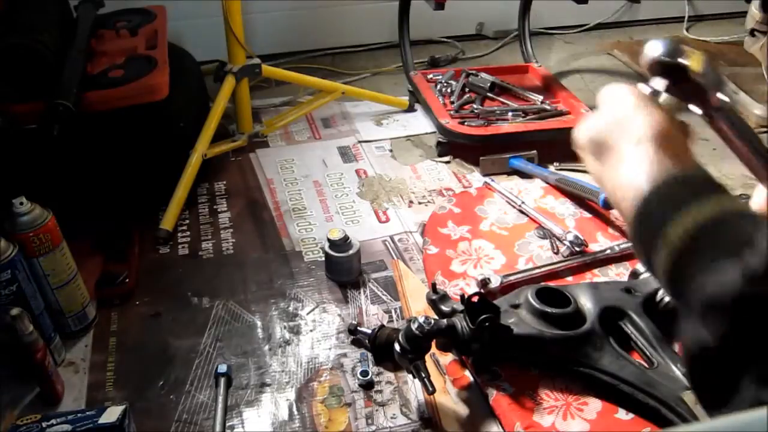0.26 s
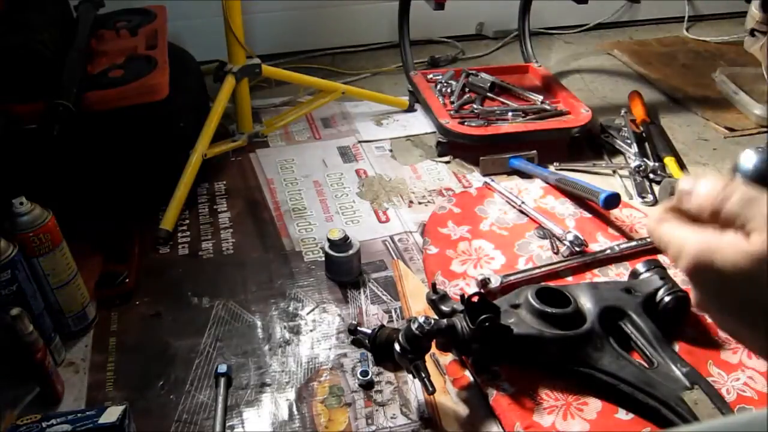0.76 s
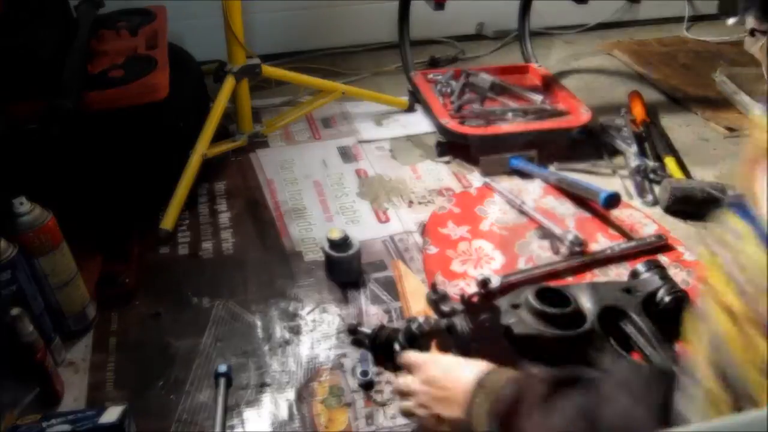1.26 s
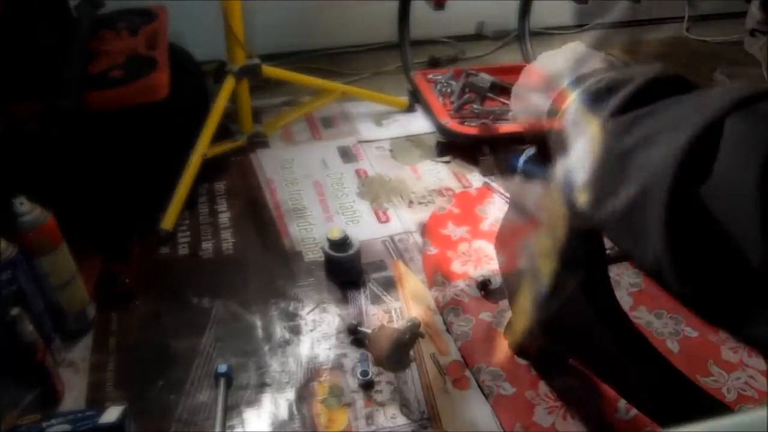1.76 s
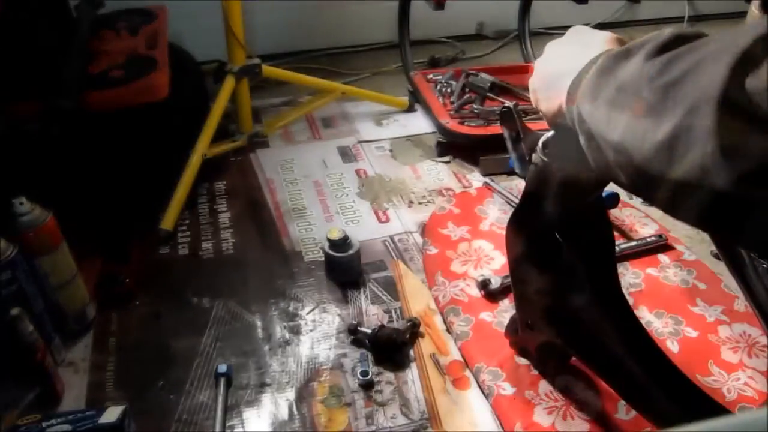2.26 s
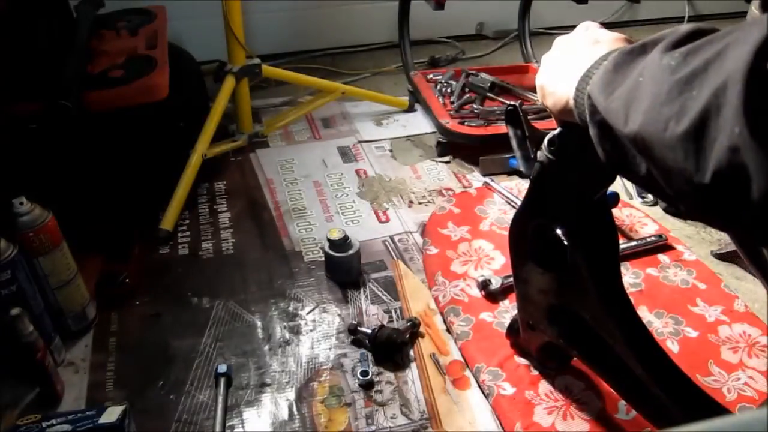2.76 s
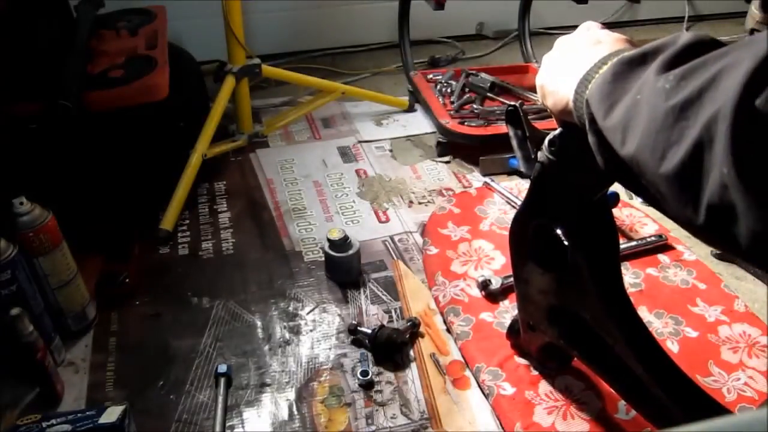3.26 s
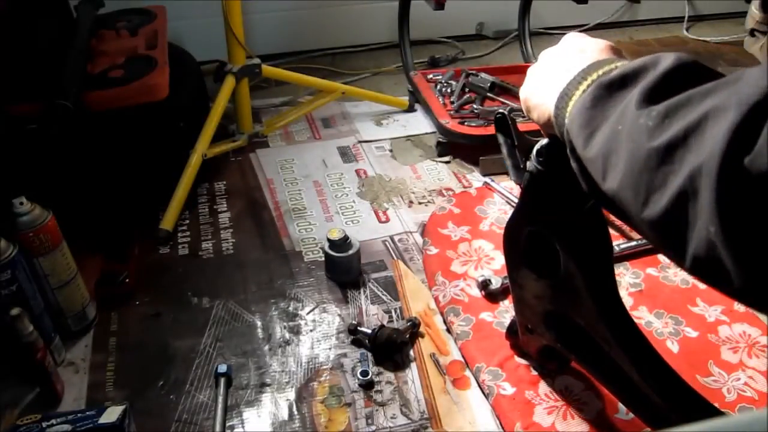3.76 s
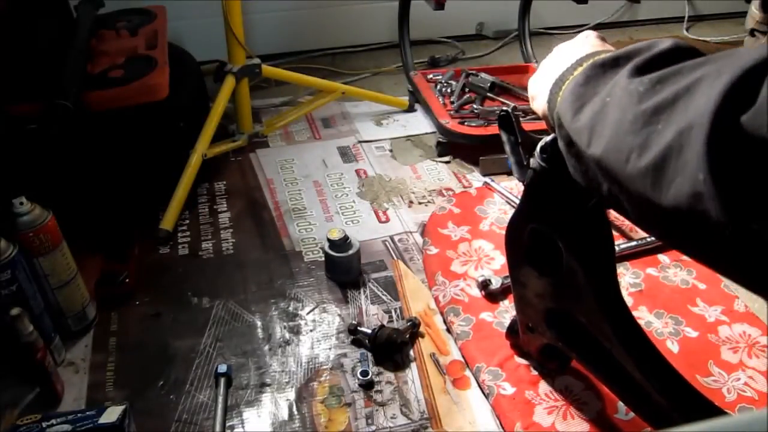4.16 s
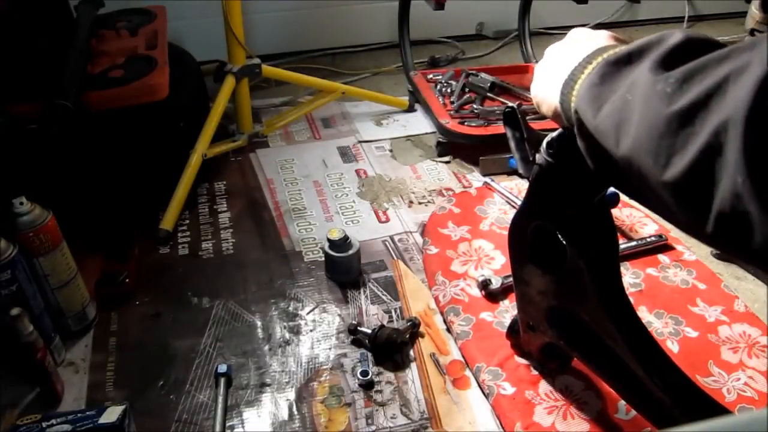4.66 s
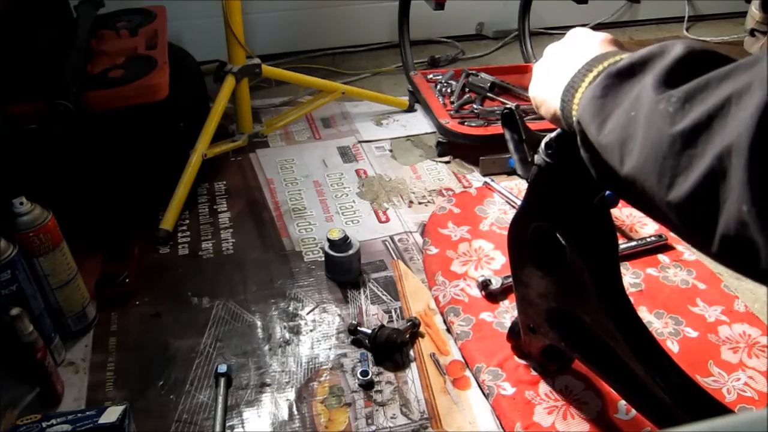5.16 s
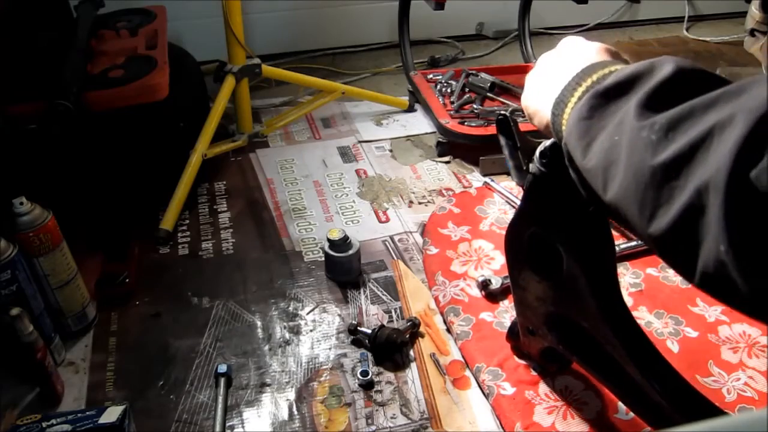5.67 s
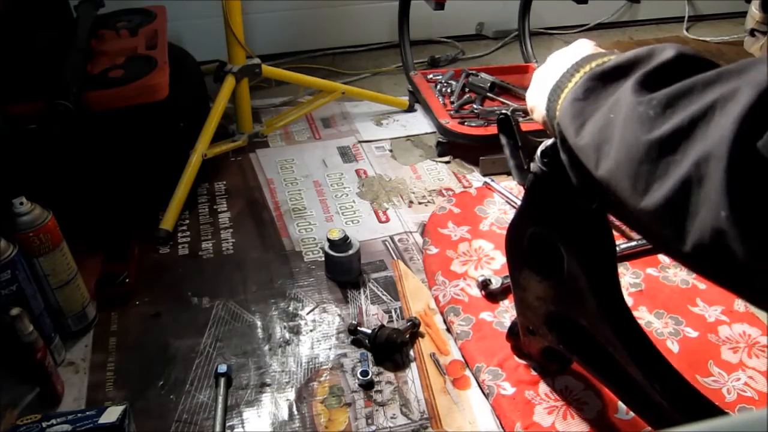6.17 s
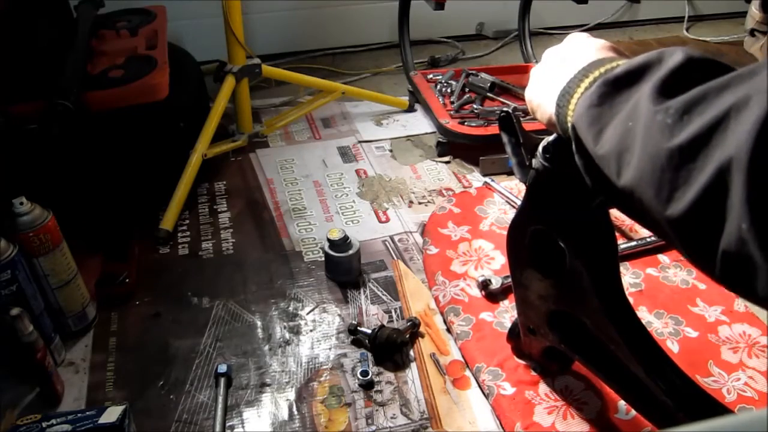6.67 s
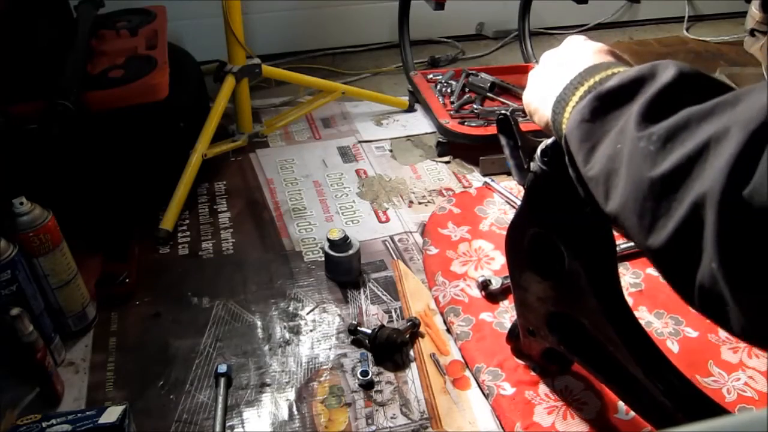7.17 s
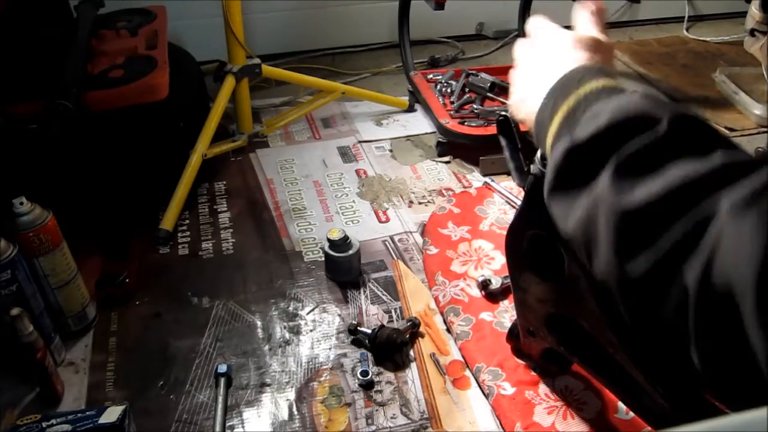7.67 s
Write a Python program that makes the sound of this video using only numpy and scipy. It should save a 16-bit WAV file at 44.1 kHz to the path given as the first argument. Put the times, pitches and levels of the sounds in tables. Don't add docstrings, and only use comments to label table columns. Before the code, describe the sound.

Close to the microphone in a hard-walled garage, hands rustle and a steel socket clatters onto a wrench. A sleeve drags hissing across paper. Then a click-type torque wrench trips three times with hard, bright cracks, each followed by a slightly softer snap back. Faint handle knocks and jacket rustle fill the gaps over low rumble and hum.

```python
import sys
import numpy as np
from scipy import signal
from scipy.fft import rfft, irfft, next_fast_len
from scipy.io import wavfile
from scipy.ndimage import uniform_filter1d

SR = 44100
rng = np.random.default_rng(int(sys.argv[2]) if len(sys.argv) > 2 else 0)


def volts(x):
    e = np.asarray(x, float) / 20
    return 10 ** e


def unload_wav(signal):
    wavfile.write(
        sys.argv[1],
        SR,
        np.round(np.clip(np.atleast_2d(signal).T, -1, 1) * 32767).astype(np.int16),
    )


N = 349757
PAD = next_fast_len(N)
HIT_SIZE = 2 ** 15
LEFT_LAG_S = 6e-5
KNEE_DB = -5.2


def along(table, hz):
    f, v = np.transpose(table)
    return np.interp(np.log(np.maximum(hz, 1)), np.log(f), v)


def unit(x):
    return x / np.sqrt(np.mean(x ** 2))


def colour(x, table):
    cepstrum = irfft(np.log(volts(along(table, np.fft.rfftfreq(1024, 1 / SR)))))
    cepstrum[1:512] *= 2
    cepstrum[513:] = 0
    response = irfft(np.exp(rfft(cepstrum)))
    return signal.oaconvolve(x, response[None], axes=1)[:, :x.shape[1]]


def band(x, lo_hz, hi_hz):
    sos = signal.butter(3, [lo_hz, hi_hz], "bandpass", fs=SR, output="sos")
    return signal.sosfilt(sos, x)


def walk(rate, size=N):
    k = int(SR / rate)
    held = np.repeat(rng.standard_normal(size // k + 1), k)
    return uniform_filter1d(uniform_filter1d(held, k), k)[:size]


def track(table):
    s, *columns = np.transpose(table)
    return [np.interp(np.arange(N) / SR, s, c) for c in columns]


def swells(events, rise, floor_db):
    t = np.arange(N) / SR
    power = volts(floor_db) ** 2
    for s, level_db, length, *_ in events:
        lengths_away = np.where(t < s, (s - t) / rise, t - s) / length
        power = power + volts(level_db - 20 * lengths_away) ** 2
    return 10 * np.log10(power)


def add(out, sound, s):
    i = int(s * SR)
    out[:, i:i + sound.shape[1]] += sound[:, :N - i]


def lean_right_db(hz):
    return np.array([[-1.5], [.8]]) * hz / 10000


# frequency in Hz, likeness of left and right from 0 to 1.
ALIKE = [(60, 0.9), (500, .8), (2000, 0.5), (5000, 0), (15000, 0.6)]


def diffuse(size):
    like = np.clip(along(ALIKE, np.fft.rfftfreq(size, 1 / SR)), 0, 1)
    mid, side = rfft(rng.standard_normal((2, size))) * np.sqrt([1 + like, 1 - like])
    return irfft(np.array([mid + side, mid - side]) / 2, size)


# frequency in Hz, 60 dB decay in seconds.
GARAGE = [(150, 0.12), (300, 0.39), (600, 0.39), (2000, 0.36), (5000, 0.36), (10000, 0.297), (15000, 0.053)]


def garage():
    t = np.arange(HIT_SIZE) / SR
    noise = diffuse(len(t))
    edges = 70 * 2 ** np.arange(0, 8.1, .5)
    tail = 0
    for lo, hi in zip(edges, edges[1:]):
        tail = tail + band(noise, lo, hi) * volts(-60 * t / along(GARAGE, np.sqrt(lo * hi)))
    tail = rfft(tail * (1 - np.exp(-t / 0.00029)))
    near, wide = (uniform_filter1d(np.abs(tail) ** 2, size=k) for k in (60, 900))
    tail = irfft(tail * np.sqrt(wide / (near + 1e-12))) * (t < .6)
    return tail / np.sqrt(np.mean(np.sum(tail ** 2, axis=1)))


def gain_control():
    duck_db, recover_s, recover_shape = -18.5, 0.48, 3
    linger_db, linger_s = -2, 3.9
    t = np.arange(N) / SR
    loud = [s for s, peak_db, *_ in TRIPS + RESETS + CLATTER if peak_db > KNEE_DB]
    since = np.array([t - s - .012 for s in loud])
    after = np.clip(since / 0.0051, 0, 1)
    since = np.maximum(since, 0)
    quick = after * np.exp(-(since / recover_s) ** recover_shape)
    slow = after * np.exp(-since / linger_s)
    return duck_db * quick.max(axis=0) + linger_db * np.sum(slow, axis=0)


# frequency in Hz, level in dB per Hz.
RUMBLE_TONE = [(11, -43.5), (18, -9), (54, -3), (118, -2), (172, -8), (293, -7), (347, -10.5), (400, -12.5),
               (520, -29), (880, -120)]
# frequency in Hz, level in dB over the rumble.
HUM = [(59, 0), (118, -11.5)]
# time in seconds, level in dB.
LEAN = [(0.0, -62.5), (.5, -48), (1.1, -50.5), (1.25, -51.5), (1.55, -48.5), (1.9, -46.5), (2.6, -47),
        (3.12, -51.5), (4.2, -53.5), (5.1, -55.5), (5.8, -48), (6.2, -56.5), (7.93, -50.5)]


def rumble(gain_db):
    t = np.arange(N) / SR
    hum = 0
    for hz, db in HUM:
        unsteady = volts(db + 1.0 * walk(8.2))
        hum = hum + unsteady * np.sin(2 * np.pi * hz * t + 0.17 * walk(4.2))
    tone = volts(along(RUMBLE_TONE, np.fft.rfftfreq(PAD, 1 / SR)))
    noise = unit(irfft(rfft(diffuse(PAD)) * tone, PAD)[:, :N])
    surge = volts(2.0 + 2.2 * walk(21))
    return volts(track(LEAN)[0] + gain_db) * (noise * surge + hum)


# frequency in Hz, level in dB per Hz.
CLOTH = [(120, -33.5), (200, -10), (577, -6), (681, -10), (1700, -2.5), (2600, -3.5), (4400, -4),
         (5600, -9), (7600, -16), (8180, -18), (8960, -18), (11200, -15), (14000, -21), (15800, -31)]


def cloth(level_db, dull_db, crisp_db, grain_db, flicker_db):
    grain_size = np.minimum(rng.exponential(size=N), 5.5)
    grains = colour(diffuse(PAD)[:, :N] * volts(grain_db * grain_size), CLOTH)
    layers = ((200, 1000, dull_db), (1000, 7800, 0), (8400, 15800, crisp_db))
    out = 0
    for lo, hi, db in layers:
        out = out + unit(band(grains, lo, hi)) * volts(level_db + db + flicker_db * walk(25))
    return out


# time in seconds, level in dB.
FIDGET = [(0.0, -49), (.3, -51), (1.2, -49.5), (1.446, -45), (1.7, -48.5), (2.5, -46), (2.68, -43.5),
          (2.71, -52), (2.8, -48), (3.14, -49), (3.95, -58), (4.12, -46.5), (4.45, -60.5), (4.85, -55),
          (5.76, -53), (6.0, -52), (6.4, -60), (6.52, -52.5), (6.62, -59), (7.93, -52)]
# peak time in seconds, level in
# dB, length in seconds.
GRIPS = [
    (.004, -31, 0.095),
    (.15, -45, 0.035),
    (.29, -49.5, 0.076),
    (.33, -34, 0.042),
    (.385, -37.5, .1),
    (.44, -42, .1),
    (.5, -36, 0.078),
    (.562, -40, .08),
    (.92, -30, 0.051),
    (4.13, -59, 0.13),
]


def rustle(gain_db):
    effort_db = swells(GRIPS, 0.46, track(FIDGET)[0])
    dull_db = 1 - 0.73 * (effort_db + 51.0) + .5 * (track(LEAN)[0] + 52)
    hiss_db = -70
    crisp_power = volts(-12) ** 2 + volts(hiss_db - effort_db) ** 2
    crisp_db = 10 * np.log10(crisp_power) + 0.17 * gain_db
    return cloth(effort_db + gain_db, dull_db, crisp_db, grain_db=2.0, flicker_db=.9)


# peak time in seconds, level in dB, length in seconds,
# pitch of the hollow under the fold in Hz, hollow level in dB.
STROKES = [(1.772, -34, 0.072, 1591, -23), (1.853, -30.5, 0.088, 1300, -16), (1.885, -31, 0.1, 1500, -22),
           (1.92, -31.5, .08, 600.4, -14), (1.952, -29.5, 0.079, 948.2, -16),
           (1.982, -26, 0.065, 1603, -4.5), (2.012, -25.5, 0.0994, 1780, -14),
           (2.096, -26, 0.04, 1200, -21), (2.108, -30, 0.0266, 955, -12.5), (2.123, -23, 0.0635, 758, -4.5),
           (2.142, -27, .04, 600, -6.5), (2.165, -34, 0.036, 478, -10), (2.185, -31.5, 0.028, 445, -9.5),
           (2.202, -24.5, 0.05, 650, -14.5), (2.22, -39, .04, 608.4, -9), (2.246, -31.5, 0.06, 1470, -30)]


def drag():
    level_db = swells(STROKES, 0.925, -100)
    hollow_hz, hollow_db = track([(s, hz, db) for s, _, _, hz, db in STROKES])
    slow = rng.standard_normal((2, N))
    slow = uniform_filter1d(uniform_filter1d(slow, size=120), size=120)
    turn = 2 * np.pi * np.cumsum(hollow_hz) / SR
    hollow = unit(slow[0] * np.cos(turn) + slow[1] * np.sin(turn))
    dull_db = -13.5 - 0.2959 * (level_db + 27.0)
    hiss = cloth(level_db, dull_db, crisp_db=-9.5, grain_db=2.5, flicker_db=1.8)
    return hiss + hollow * volts(level_db + hollow_db)


# start in seconds, peak in dB,
# pitch in Hz, 60 dB decay in seconds, rise in milliseconds.
PINGS = [(.004, -46, 11000, .2, .8), (.15, -40, 108, .25, 15), (.15, -43, 250, .2, 12),
         (.28, -42, 2600, .12, 10), (.292, -37, 1120, .15, 8), (.323, -36, 1080, .09, 2),
         (.378, -38, 1080, .1, 3), (.358, -40, 100, .2, 15), (.37, -38, 250, .15, 12),
         (.585, -46, 2550, .3, 3), (.585, -46, 3070, .25, 3), (.913, -57, 12400, .3, .8),
         (3.156, -57, 4861, 1.2, 3), (3.985, -41, 186, .3, 25), (4.0, -46, 375, .3, 20),
         (4.058, -46, 200, .12, 8), (4.11, -57, 1000, .5, 20), (4.278, -46, 100, .15, 10),
         (4.335, -46, 95, .15, 10), (4.365, -44, 90, .15, 10), (4.318, -45, 1690, .2, 3),
         (4.318, -45, 3050, .12, 3), (5.167, -42, 3750, .6, 3), (5.757, -61, 370, .3, 5),
         (6.075, -52, 3100, .08, 2), (6.12, -54, 3200, .2, 10), (6.125, -58, 5900, .2, 6),
         (6.969, -43, 3745, .65, 3), (7.523, -54, 12350, .36, 3), (7.523, -57, 12150, .25, 3),
         (7.523, -59, 12620, .3, 3), (7.524, -45, 1694, .45, 3), (7.526, -38, 3066, .26, 3),
         (7.526, -46, 4597, .32, 3), (7.526, -46, 3461, .25, 3), (7.526, -50, 2885, .25, 3),
         (1.5, -41, 450, .3, 40), (1.56, -42, 330, .25, 30), (3.62, -39, 1678, .25, 30),
         (5.6, -44, 1680, .4, 40), (7.37, -43, 1685, .35, 30), (3.157, -50, 3755, .4, 3)]


def pings():
    out, t = np.zeros((2, N)), np.arange(SR) / SR
    for s, peak_db, hz, t60, rise_ms in PINGS:
        wobble = volts(3 * walk(45, size=SR))
        swell = 1 - np.exp(-1000 * t / rise_ms)
        level = volts(peak_db + lean_right_db(hz) - 60 * t / t60)
        add(out, level * swell * wobble * np.sin(2 * np.pi * hz * t), s)
    return out


# start in seconds, peak in dB, pitch in Hz, 60 dB decay in milliseconds.
TICKS = [(.2975, -29, 2250, 20), (.3005, -38, 2300, 14), (.3022, -22, 2280, 16), (.3025, -31, 3500, 8),
         (0.31, -18, 2750, 8), (0.322, -27, 10900, 7.9), (.3735, -36.5, 12300, 12), (0.37, -17.5, 2970, 12),
         (.4218, -28, 2530, 20), (0.4224, -33.5, 10900, 8), (0.424, -30.5, 1000, 30),
         (0.4627, -18, 3240, 15), (0.4721, -10, 11900, 3.9), (.474, -20, 10200, 12),
         (.4745, -19.5, 4100, 15), (.47, -27.5, 704, 40), (0.561, -34.5, 3000, 6), (.5812, -2.5, 12170, 5),
         (.5822, -4, 10870, 5), (0.92, -24.5, 10900, 3.5), (.915, -31, 10500, 8), (0.92, -34, 4000, 13),
         (.913, -40.5, 1810, 21), (0.9308, -32.5, 3000, 8), (3.1557, -3, 10530, 5.5),
         (4.7974, -49.5, 10500, 8), (4.972, -51, 11000, 8), (5.0247, -48.5, 10500, 8),
         (5.1663, 1, 10700, 6), (6.9695, -5.5, 10800, 5), (7.5244, -26, 3150, 9), (7.5227, -29, 5900, 23),
         (7.5337, -31, 3100, 16.7), (7.5395, -29, 3400, 17), (7.5277, -22, 4100, 5), (0.31, -25, 2600, 12),
         (0.3248, -29, 1050, 30), (.381, -31, 1000, 25), (.3745, -33, 10400, 10), (.322, -30, 15000, 8),
         (0.28, -32.5, 2400, 8), (5.86, -54, 3300, 25), (8.4, -50, 1325, 15), (7.746, -44, 1300, 12),
         (7.745, -47.5, 350, 21)]


def ticks(echo):
    out, t = np.zeros((2, N)), np.arange(4096) / SR
    for s, peak_db, hz, t60_ms in TICKS:
        late = np.maximum(t - np.array([[LEFT_LAG_S], [0]]), 0)
        level = volts(peak_db + lean_right_db(hz) - 60000 * late / t60_ms)
        add(out, level * np.sin(2 * np.pi * hz * late), s)
    return out + volts(-19) * signal.oaconvolve(out[1:], irfft(echo), axes=1)[:, :N]


def ring_modes(ring, t):
    hz, db, t60 = np.transpose(ring)[:, :, None]
    split, twin_share = .011, .6
    tone = np.sin(2 * np.pi * hz * t)
    twin = np.sin(2 * np.pi * hz * (1 + split) * t)
    return rfft(np.sum(volts(db - 60 * t / t60) * (tone + twin_share * twin), axis=0))


def hits(events, ring, crack, echo, ring_db, wet_db, duck_db, dip_s, rise, size=HIT_SIZE):
    out, t = np.zeros((2, N)), np.arange(size) / SR
    echo = echo[:, ::HIT_SIZE // size]
    modes = ring_modes(ring, t)
    lag = np.exp(-2j * np.pi * np.fft.rfftfreq(size, 1 / SR) * LEFT_LAG_S)
    for s, peak_db, treble_db, thud_db, rattle_ms in events:
        dip_db = duck_db / (1 + np.exp((KNEE_DB - peak_db) / 1.9))
        u = 1000 * t / max(rattle_ms, .3)
        rattle = rfft(rng.standard_normal((1, size)) * (1 - np.exp(-u / rise)) * np.exp(-u))
        rattle = irfft(rattle / np.abs(rattle) ** .9) * np.exp(-u / 4)
        rattle = band(band(rattle, 210., 19000.), 210., 19000.)
        tone = [(f, g + treble_db * (f > 8000) + thud_db * (f < 1000)) for f, g in crack]
        snap = colour(rattle, tone)
        uneven = volts(1.5 * np.repeat(rng.standard_normal(129), 128)[:len(modes)])
        rung = irfft(rfft(rattle) * modes * uneven)
        snap = rfft(snap / np.abs(snap).max())
        rung = rfft(volts(ring_db) * rung / np.abs(rung).max())
        direct = (snap + rung) * np.array([lag, np.ones_like(lag)])
        heard = irfft(direct + volts(wet_db) * (snap + .4 * rung) * echo)
        dip = 1 / (1 + np.exp(-np.clip((t - dip_s) / 0.0065, -30, 30)))
        add(out, (heard * volts(peak_db - dip_db * dip))[:, :size - size // 8], s)
    return out


# start in seconds, peak in dB, treble in dB, thud in dB, rattle in milliseconds.
KNOCKS = [(2.669, -39, 13.5, 0, 11.9), (3.947, -26.5, -9.5, -1, 5.5), (3.957, -30.5, -14, 16, 2.5),
          (4.009, -43, 4, 20, 6.2), (4.307, -39.5, 0, 25, 4), (4.321, -26, -22, 4, 4.3),
          (4.354, -33, 0, 16, 4.07), (5.762, -49.5, 5, 21.5, 13.9), (5.858, -54, -19, -2, 4.7),
          (6.077, -40.5, -4.5, -13, 6), (6.105, -47, -6.5, 15, 8), (6.118, -40.5, -5.5, 8, 10),
          (6.133, -38.5, 1, -5, 3), (6.153, -45, -3, 18.5, 2.1), (6.541, -42.5, -39, 16.5, 9.66),
          (7.5125, -34, -10, 4.5, 3.03), (7.5185, -42, -12, 5.5, 2), (7.5215, -26.5, 9, 4, 2.4),
          (7.5252, -21, -0.5, -6.5, 2.5), (7.5325, -26, -2.5, -13, 3), (7.539, -38, -2.5, -13, 4),
          (7.735, -51, 8, 13.5, 3.35), (7.747, -54, 7.5, 17, 1.7)]
# frequency in Hz, level in dB, 60 dB decay in seconds.
KNOCK_RING = [(1780, -5, 0.048), (3070, -18, 0.058), (3560, 1, 0.038), (4325, -1.5, 0.043)]
# frequency in Hz, level in dB per Hz.
KNOCK_CRACK = [(88, -50), (400, -18), (700, -20.5), (1100, -16.5), (1870, -1.5), (2310, -9.5), (3100, -2.5),
               (5870, -21.5), (8330, -33), (9920, -29.5), (12500, -29), (15500, -50)]


def knocks(echo):
    return hits(KNOCKS, KNOCK_RING, KNOCK_CRACK, echo, ring_db=-6, wet_db=-2.0, duck_db=0,
                dip_s=.012, rise=0.225, size=HIT_SIZE // 2)


# start in seconds, peak in dB, treble in dB, thud in dB, rattle in milliseconds.
CLATTER = [(0.267, -44, -8, -11, 25), (0.295, -35, -21.5, 5.5, 2.3), (0.3154, -23.5, -13.5, -20, 0.95),
           (0.3209, -9, -6.5, -5, 1.4), (0.371, -23, -12, 0, 1.3), (0.3723, -18.5, -14.5, -0.5, 2.8),
           (.4220, -25.5, 0, 1, 1.64), (.460, -20, 2.5, 3.5, 3.7), (0.4623, -17.5, -7.5, -2.5, 0.87),
           (0.4698, -17, -2, 12, 1.6), (0.4729, -8.5, 7, 1, 1.1), (.475, -13.5, 8, 5, 3.7),
           (.4845, -21.5, 8, -4, 4), (.494, -24, 5, -4, 4), (0.3269, -22, -10, 0, 3),
           (0.3363, -26, -10, -4, 4), (0.3783, -25, -10, 2, 3), (.391, -30, -10, 0, 4),
           (.571, -14.5, -12.5, -5.5, 5.74), (0.5748, -15.5, -8, -7.5, 3.6), (0.5814, 0.5, 10.5, -12.5, .8),
           (0.5821, 1.5, 6, -6.5, 0.99), (0.585, -10, 0.5, -8.5, 0.81), (0.5929, -21.5, -8, -12.5, 3),
           (0.598, -22, -5.5, -11.5, 1.6), (0.908, -33, -9, -9, 0.96), (0.9185, -31, -28.5, -14.5, 2.2),
           (0.923, -32, -15.5, -7, 4.66)]
# frequency in Hz, level in dB, 60 dB decay in seconds.
SOCKET_RING = [(2680, -12, .025), (3270, -5.5, .03), (4190, -7, 0.06), (5900, -7, .04), (12100, -12, .015),
               (1080, -27, .06), (2550, -15, .2), (3120, -14, .15), (6000, -16, .25)]
# frequency in Hz, level in dB per Hz.
SOCKET_CRACK = [(88, -37.5), (150, -6), (716, -15.5), (888, -18), (1100, -8), (1420, -11.5), (2550, 1),
                (4080, 3), (5300, -3), (7040, -9), (8400, -18), (11900, -13.5), (13700, -17), (15000, -30),
                (16000, -38)]


def clatter(echo):
    return hits(CLATTER, SOCKET_RING, SOCKET_CRACK, echo, ring_db=-11, wet_db=-7.0, duck_db=6.0,
                dip_s=0.018, rise=0.22, size=HIT_SIZE // 2)


# start in seconds, peak in dB, treble in dB, thud in dB, rattle in milliseconds.
RESETS = [
    (3.5331, -2.5, 2.02, -1.9, 5.4),
    (5.5229, -2, 3.63, -1.65, 4.58),
    (7.3008, -3, 1.6, -0.7, 5.46),
]
# frequency in Hz, level in dB, 60 dB decay in seconds.
RESET_RING = [(1679, -13, .15), (2035, -13, 0.27), (2673, -6, .07), (3068, 2, 0.13), (3500, -11.5, 0.13),
              (3785, -11.5, .18), (4240, -2, 0.062), (4480, -2.5, 0.076), (5690, -10, 0.35),
              (10240, -8.5, 0.064), (3100, -17.5, 0.39), (4610, -13, 0.21), (807.7, -23.5, 0.36),
              (303.4, -26.5, 0.15)]
# frequency in Hz, level in dB per Hz.
RESET_CRACK = [(200, -48), (330, -21.5), (759, -15.5), (1240, -21.5), (1660, -7.5), (2280, -11),
               (3000, -2.5), (3400, -5.5), (4350, -4.5), (5150, -14), (7300, -11), (7900, -23.5),
               (8730, -29.5), (10400, -14.5), (12600, -36.5), (13700, -26.5), (14500, -55)]


def resets(echo):
    return hits(RESETS, RESET_RING, RESET_CRACK, echo, ring_db=-2, wet_db=2.5, duck_db=11.0,
                dip_s=0.012, rise=0.056)


# start in seconds, peak in dB, treble in dB, thud in dB, rattle in milliseconds.
TRIPS = [
    (3.1546, 4, 3, -3, 2.4),
    (5.166, 2.5, 0.5, -3.5, 3.6),
    (6.9673, 2, 0.5, -3.5, 3.7),
]
# frequency in Hz, level in dB, 60 dB decay in seconds.
TRIP_RING = [(850, -17, .06), (2020, -16, .14), (2490, -17, .12), (3010, -1, .045), (4055, 0, .07),
             (4300, -10, .2), (4480, -4, .08), (5890, -10, .13), (6420, -11, .08), (6790, -11, .08),
             (10710, -13, .07), (3072, -13, .28), (1018, -22.5, .15), (323, -21, .12)]
# frequency in Hz, level in dB per Hz.
TRIP_CRACK = [(150, -58), (300, -10.5), (560, -16), (900, -6), (1420, -18.5), (2100, -9), (2950, -3.5),
              (3450, -8), (4320, -3.5), (5050, -13.5), (7000, -3), (7500, -24), (8700, -21.5),
              (10700, -11.5), (12600, -28), (14200, -23), (14700, -50)]


def trips(echo):
    return hits(TRIPS, TRIP_RING, TRIP_CRACK, echo, ring_db=-4, wet_db=0.0, duck_db=11.0,
                dip_s=0.0083, rise=0.32)


def scene():
    echo, gain_db = rfft(garage()), gain_control()
    background = rumble(gain_db) + rustle(gain_db) + drag()
    small_parts = pings() + ticks(echo) + knocks(echo) + clatter(echo)
    return background + small_parts + resets(echo) + trips(echo)


def top_cut(x):
    return signal.sosfilt(signal.butter(12, 16410, fs=SR, output="sos"), x)


def record(dry):
    f = np.fft.rfftfreq(PAD, 1 / SR)
    gap_db = -32 * np.exp(-((f - 8200) / 420) ** 4)
    lean_db = np.array([[-5.5], [3.5]]) / (1 + np.exp(-(f - 8300) / 300))
    top_db = -45 / (1 + np.exp(-(f - 15850) / 70))
    coloured = irfft(rfft(dry, PAD) * volts(gap_db + lean_db + top_db), PAD)[:, :N]
    return top_cut(np.clip(coloured, -1, 1))


dry = scene()
out = record(dry)
unload_wav(out)
```